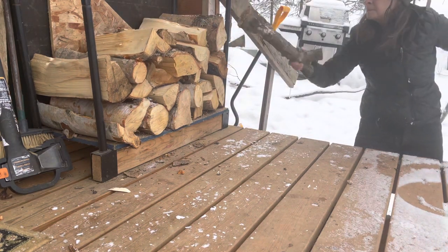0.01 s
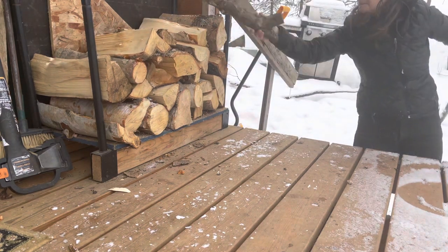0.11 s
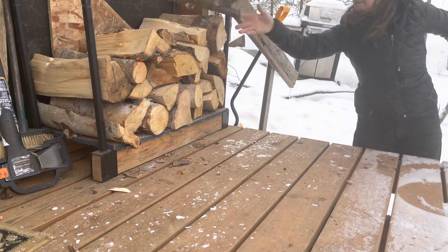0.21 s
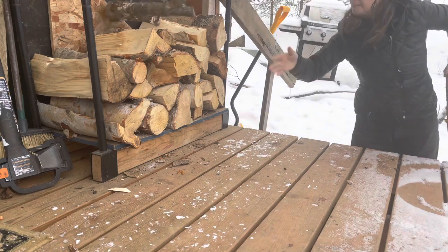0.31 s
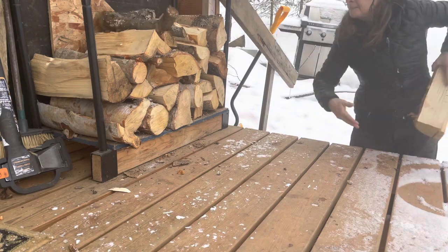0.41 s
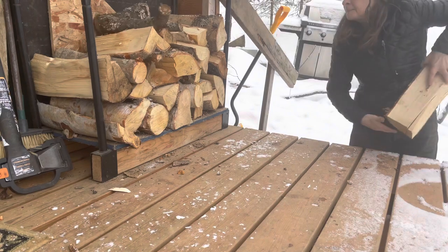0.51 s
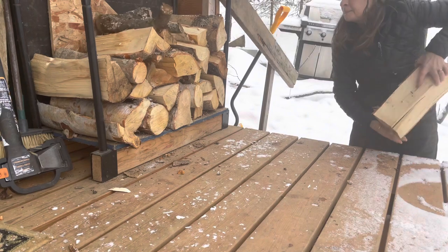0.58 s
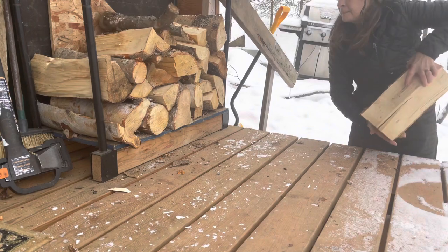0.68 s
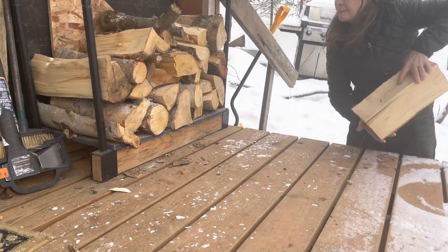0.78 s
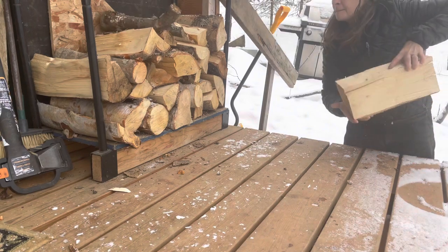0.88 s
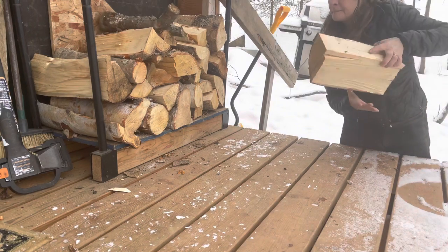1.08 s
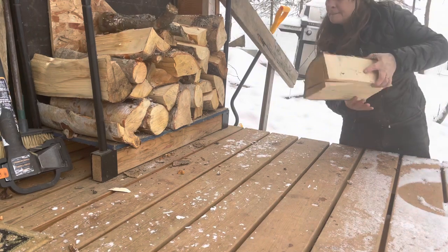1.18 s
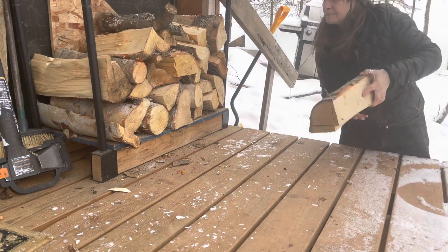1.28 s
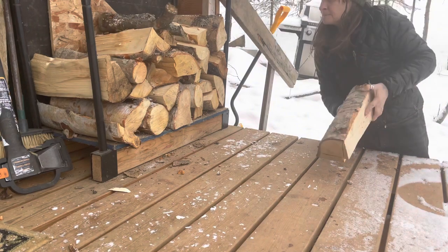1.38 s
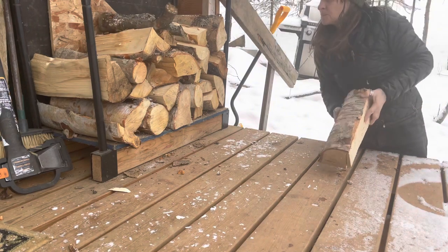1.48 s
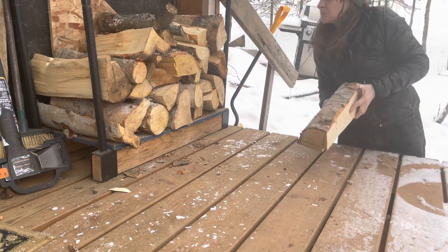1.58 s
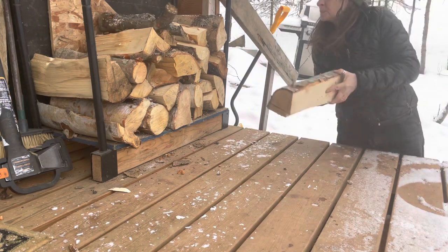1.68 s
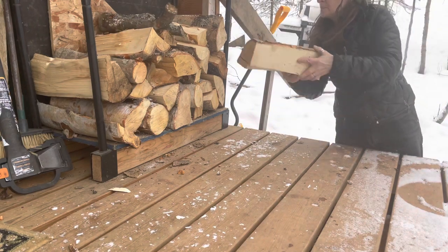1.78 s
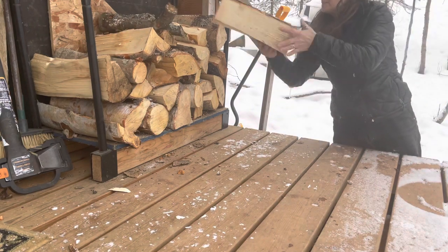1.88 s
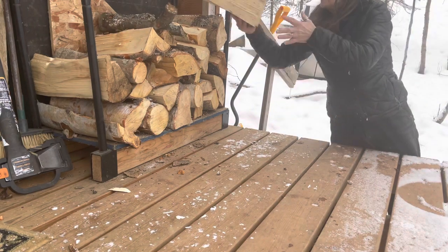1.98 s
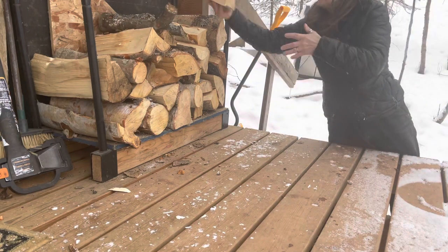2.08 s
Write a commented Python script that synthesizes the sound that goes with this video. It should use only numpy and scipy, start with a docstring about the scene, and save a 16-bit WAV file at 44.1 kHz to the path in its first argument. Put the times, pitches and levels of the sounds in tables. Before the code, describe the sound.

Outdoors on a wooden deck, a faint jacket swish and bark graze lead to a loud log knock at 0.2 s, with a deep, short boom through the boards and log chatter. It rocks and scrapes until a soft hollow settling knock at 0.6 s. A small bright clack comes at 0.78 s, a soft palm pat at 1.23 s, and jacket swishes from 1 s, brightest near 2.04 s, over quiet low air.

```python
"""Outdoors, a jacket swishes as a split log is tossed onto a firewood rack on a wooden deck.
The log grazes the pile, lands with a knock that booms through the boards, rocks, sheds bark and settles.
The next log clacks, then pats into a hand while the padded jacket swishes on over quiet air.
Wood rings as decaying sines; bark and chatter are grainy noise, cloth is grainy and smooth noise,
air is smooth noise, and the wood has a faint outdoor scatter."""
import sys
import numpy as np
from scipy import signal
from scipy.fft import rfft, irfft
from scipy.io import wavfile

SR = 44100
rng = np.random.default_rng(int(sys.argv[2]) if len(sys.argv) > 2 else 0)


def master(y):
    """Save y as 16-bit WAV."""
    cut = np.clip(np.atleast_2d(y).T, -1, 1)
    pcm = np.round(cut * 32767)  # scale
    wavfile.write(sys.argv[1], SR, pcm.astype(np.int16))


N = 92610  # samples, 2.1 s
TIME, FREQS = np.arange(N) / SR, np.fft.rfftfreq(N, 1 / SR)  # s, Hz
FLAT = [(20, 0), (20000, 0)]  # even noise colour: hz, level_db


def amp(db):
    """Decibels to gain."""
    return 10 ** (np.asarray(db) / 20)


def unit(x):
    """Scales to rms 1."""
    return x / np.sqrt(np.mean(x ** 2) + 1e-20)


def read(points, hz):
    """Reads a table on a log-frequency axis."""
    f, value = np.transpose(points)
    return np.interp(np.log(hz + 1), np.log(f + 1), value)


def level(points, axis=1):
    """Gain over time from one dB column of a curve."""
    columns = np.transpose(points)
    return amp(np.interp(TIME, columns[0], columns[axis]))


def since(start):
    """Time since an event, zero before it."""
    return np.maximum(TIME - start, 0)


def fade(t, rise, t60):
    """Quick rise and exponential decay; t60 is the time to fall 60 dB."""
    decay = np.exp(-np.log(1000) * t / t60)
    return (1 - np.exp(-t / rise)) * decay


def swell(t, peak_s):
    """Grows to a peak and dies quickly."""
    return (t / peak_s * np.exp(1 - t / peak_s)) ** 2


def pan(db):
    """Left and right gains; positive leans left."""
    return amp(np.array([[db], [-db]]) / 2)


def dull(hz, edge_hz):
    """A soft contact excites little above its edge."""
    return 1 / np.sqrt(1 + (hz / edge_hz) ** 4)


def ring(t, hz, db, t60, rise):
    """One decaying mode."""
    return amp(db) * fade(t, rise, t60) * np.sin(2 * np.pi * hz * t)


def tap(s, db, modes):
    """A light contact rings a log's notes once."""
    rise_s = 0.001
    return sum(ring(since(s), hz, db + mode_db, t60, rise_s) for hz, mode_db, t60 in modes)


def noise(spectrum, grainy=False):
    """Coloured stereo noise, smooth or made of tiny snaps."""
    # likeness of the two channels: hz, left_right_correlation
    likeness = [(60, 1), (160, .88), (440, 0.59), (1700, 0.63), (3500, 0.28), (7000, 0.52), (9500, -0.31),
                (11000, -0.36)]
    grains_per_s, grain_spread_db = 4600, 3
    z = rng.standard_normal((2, N))
    if grainy:
        snaps = rng.random((2, N)) < grains_per_s / SR
        loudness = np.minimum(rng.exponential(1, (2, N)), 4)  # a few snaps stand out
        z = np.sign(z) * snaps * amp(grain_spread_db * loudness)
    same = np.clip(read(likeness, FREQS), -1, 1)
    coloured = rfft(z) * amp(read(spectrum, FREQS))
    # the likeness sets the balance of mid and side
    mid, side = irfft(coloured * np.sqrt([1 + same, 1 - same]), N)
    return unit(np.array([mid + side, mid - side]))


def jacket():
    """Sleeves rub the padded coat as the arms swing."""
    # swish strength: start_s, body_db, treble_db
    swish = [(0, -79, -56), (.05, -84, -65.5), (.08, -90.5, -84), (.95, -82, -87), (.99, -67.5, -64),
             (1.16, -67.5, -56.5), (1.22, -61, -57), (1.27, -58, -56), (1.37, -55.5, -57.5),
             (1.5, -62, -67), (1.6, -65, -64.5), (1.75, -56.5, -54.5), (1.85, -56, -58), (1.95, -62, -63),
             (2.005, -68, -55), (2.04, -57.5, -43), (2.065, -61, -53.5), (2.1, -68.5, -65.5)]
    # colour of the padding's grainy body: hz, level_db
    cloth_body = [(80, -15), (250, -2), (750, 3.5), (1400, 1), (2200, -0.5), (3200, -8.5), (6000, -29.5)]
    # colour of the smooth treble: hz, level_db
    cloth_hiss = [(500, -21), (2000, -1.5), (3500, -4.5), (5500, -7), (7200, -8), (8500, 2.5), (9700, 3),
                  (12500, -16.5)]
    body = noise(cloth_body, grainy=True) * level(swish, axis=1)
    treble = noise(cloth_hiss) * level(swish, axis=2)
    return pan(db=1) * (body + treble)


def air():
    """Quiet outdoor rumble with a trace of hiss."""
    # colour before the treble is dulled: hz, level_db
    air_colour = [(15, -32.5), (25, -6), (106, -2), (349, -17), (665, -18.5), (1060, -29), (1920, -14.5),
                  (5820, -25), (9030, -13), (12000, -60)]
    level_db, dull_hz = -58.5, 850
    softening = 0.15 + dull(FREQS, dull_hz)  # the floor keeps some hiss
    softened = irfft(rfft(noise(air_colour)) * softening, N)
    return pan(db=1.56) * amp(level_db) * unit(softened)


def bark():
    """Bark scrapes and crumbles, and crunches under each contact with wood or hand."""
    # scrape strength: start_s, level_db
    scrape_curve = [(0, -57), (.045, -56), (.07, -70.5), (.2, -61.5), (.22, -44), (.26, -40), (.32, -61),
                    (.345, -49.5), (.372, -42.5), (.41, -54), (.48, -50), (.54, -58), (.65, -54),
                    (.745, -65), (.79, -54), (.82, -53.5), (.87, -70)]
    # colour of scraping bark: hz, level_db
    scrape_colour = [(200, -3.5), (1000, -1.5), (2500, -0.5), (5000, -5), (7000, -2.5), (9000, 5),
                     (11000, 1.5), (12500, -13.5)]
    # crunches: start_s, level_db, t60_s, left_right_db
    crunches = [(0.1554, -48.5, 0.024, 6), (0.204, -16.5, 0.023, 0), (0.2064, -19.5, 0.013, 6.5),
                (0.254, -38, 0.037, 8), (0.292, -42, 0.042, 4), (0.3699, -35, .01, 2),
                (0.489, -44, .008, -3), (0.7821, -32.5, 0.017, 2.5), (1.2273, -46.5, 0.02, 1)]
    # colour of a crunch: hz, level_db
    crunch_colour = [(100, -9), (700, -1.5), (2500, -3.5), (4000, -2), (5200, -11), (7500, -4), (10000, -6),
                     (12500, -23)]
    rise_s = 0.00032
    bursts = sum(pan(lr) * amp(db) * fade(since(s), rise_s, t60) for s, db, t60, lr in crunches)
    crunch = noise(crunch_colour) * bursts
    scrape = noise(scrape_colour, grainy=True) * level(scrape_curve)
    return crunch + pan(db=2.5) * scrape


def rubs():
    """Bark and splinters catch, buzz and let go: rough noise in one resonance each."""
    # rubs: start_s, level_db, pitch_hz, width_hz, t60_s, length_s
    rub_list = [(0, -54.5, 1215, 89, .4, 0.063), (0, -58.5, 2580, 300, 0.97, 0.063),
                (0.121, -48, 470, 830, 0.15, 0.034), (0.159, -45, 1002, 850, 0.21, 0.13),
                (0.159, -42.5, 283, 380, 0.17, 0.082), (0.346, -40, 590, 540, 0.18, 0.037),
                (.564, -28.5, 10580, 1820, 0.013, 0.019), (0.604, -36, 400, 566, 0.11, 0.067),
                (0.784, -49.5, 282, 400, 0.1, 0.068), (0.777, -42, 2180, 1396, 0.21, 0.069),
                (1.153, -51, 425, 557, 0.12, 0.038), (1.993, -33.5, 9140, 2980, 0.014, .008)]
    rise_s = 0.0016
    rough = rfft(noise(FLAT, grainy=True))
    out = np.zeros((2, N))
    for s, db, hz, width, t60, length in rub_list:
        t = since(s)
        buzz = unit(irfft(rough * dull(FREQS - hz, width / 2), N))
        let_go = np.exp(-(t / length) ** 6)
        out += amp(db) * buzz * fade(t, rise_s, t60) * let_go
    return pan(db=1.5) * out


def blows():
    """Wood on wood or on a palm: a few cycles that swell and die quickly."""
    # dry blows: start_s, level_db, pitch_hz, time_to_peak_s, left_right_db
    blow_list = [(.1478, -38, 915, 0.00061, 10), (.1556, -27, 780, 0.00056, -4),
                 (.2046, -7.5, 948, 0.0021, 9.5), (0.2071, -19, 2536, .001, 13.5),
                 (.3495, -36, 520, 0.0034, 9), (0.783, -25, 1820, 0.00094, -7),
                 (0.7824, -33.5, 3120, 0.00047, 4), (1.2281, -31, 600, 0.00086, -3),
                 (1.234, -42.5, 313, 0.00094, 5)]
    out = np.zeros((2, N))
    for s, db, hz, peak_s, lr in blow_list:
        t = since(s)
        out += pan(lr) * amp(db) * swell(t, peak_s) * np.sin(2 * np.pi * hz * t)
    return out


def log_knocks():
    """Each contact rings the tossed log; the pile damps it more or less."""
    # the log meeting the pile: start_s, level_db, dull_above_hz, ring_length_ratio, left_right_db
    knocks = [(.156, -33, 1700, 0.27, 6), (.2052, -16, 2270, 1, 8.5), (.2185, -23, 1450, 0.49, -9),
              (.228, -20, 1700, 0.57, 0), (.349, -39.5, 1000, 0.56, 15), (.3635, -38.5, 1110, .5, 3)]
    # notes of the tossed log: pitch_hz, level_db, t60_s (before the ring length ratio)
    log_notes = [(478, -6, 0.16), (556.2, -5.5, 0.15), (597.2, 0, .13), (676, -6, 0.1), (794, -7, 0.086),
                 (963, -6, 0.095), (875, -8.5, 0.079), (1049.6, -10, 0.071), (1138, -10, 0.14),
                 (1235, -9, .15), (1253, -10.5, .13), (1475, -17, 0.084), (1903, -11, 0.1),
                 (2547, -17.5, 0.092)]
    rise_s = 0.0026
    out = np.zeros((2, N))
    for s, db, edge, length, lr in knocks:
        t = since(s)
        for hz, mode_db, t60 in log_notes:
            note = ring(t, hz, db + mode_db, t60 * length, rise_s)
            out += pan(lr) * note * dull(hz, edge)
    return out


def thud():
    """The first bending wave: high notes cross the boards first, so the landing sweeps downward."""
    start_s, level_db, peak_s = 0.2052, -1.7, 0.0089
    from_hz, to_hz, glide_s = 885, 60.06, 0.0054
    t = since(start_s)
    # cycles so far, as the pitch slides exponentially
    turns = to_hz * t + (from_hz - to_hz) * glide_s * (1 - np.exp(-t / glide_s))
    return pan(db=2.5) * amp(level_db) * swell(t, peak_s) * np.sin(2 * np.pi * turns)


def deck():
    """Weight falling on rack and deck booms through the boards at the landing and as the log rocks."""
    # falls of weight: start_s, level_db, dull_above_hz
    thumps = [(0.2096, -2.5, 916), (.366, -28, 262)]
    # notes of rack and deck: pitch_hz, level_db, t60_s
    deck_notes = [(53.92, -16.5, 0.63), (69.75, -30, 0.52), (95.9, -2.5, .21), (140, -16.5, .19),
                  (151.9, -14, 0.13), (187, -1, 0.08), (211, -15, .19), (250, -3, 0.05),
                  (440.5, -13, 0.089)]
    bend_s, rise_s = 0.006, 0.0045  # bend_s: travel time of a 100 Hz bending wave
    out = 0
    for s, db, edge in thumps:
        for hz, mode_db, t60 in deck_notes:
            arrival_s = s + bend_s * np.sqrt(100 / hz)  # low notes arrive later
            out = out + ring(since(arrival_s), hz, db + mode_db, t60, rise_s) * dull(hz, edge)
    return pan(db=1.5) * out


def pile():
    """Neighbouring logs chatter against each other after a jolt."""
    # bouts of chatter: start_s, level_db, t60_s
    chatter = [(.214, -19.5, 0.22), (0.343, -39.5, 0.81)]
    # colour of the chatter: hz, level_db
    pile_colour = [(40, -14.5), (130, 3), (220, 4.5), (400, -9), (700, -13), (1200, -14.5), (1700, -24.5),
                   (3000, -33), (8000, -34.5), (12000, -43.5)]
    bouts = sum(amp(db) * fade(since(s), 0.004, t60) for s, db, t60 in chatter)
    return pan(db=2.0) * noise(pile_colour, grainy=True) * bouts


def rocking():
    """The loaded rack rocks on the boards in soft low swells."""
    # rocks: middle_s, level_db, pitch_hz, half_length_s
    rocks = [(0.335, -29, 56, 0.023), (0.381, -30.5, 72.5, 0.0094), (0.409, -26.5, 67, 0.013),
             (0.464, -37.5, 59.6, 0.031), (0.524, -31.5, 78.5, 0.022), (0.552, -37, 101, 0.017),
             (0.647, -44, 75.4, 0.025)]
    out = 0
    for s, db, hz, half in rocks:
        t = TIME - s
        out = out + amp(db) * np.exp(-(t / half) ** 2) * np.sin(2 * np.pi * hz * t)
    return pan(db=1.5) * out


def seating():
    """A log below drops into its seat with one soft, hollow knock as the pile settles."""
    # notes of the seated log: pitch_hz, level_db, t60_s
    seated_log = [(212.5, -5, 0.092), (283, -5, 0.05), (478.5, -3.5, 0.24), (576, 1, 0.11),
                  (526, 1.5, 0.053), (808, -5, 0.064), (1120, -15, 0.12), (1239, -8, 0.13)]
    return pan(db=4.0) * tap(s=0.6035, db=-33.5, modes=seated_log)


def clack():
    """A small, bright knock on the next log as it is picked up."""
    # notes of the next log: pitch_hz, level_db, t60_s
    clacked_log = [(1662, -2.5, 0.098), (1705, 1, 0.091), (1967, -3, 0.063), (2085, -2, 0.087),
                   (2696, 1, 0.024), (3100, -2, 0.032)]
    return pan(db=1) * tap(s=0.7838, db=-40, modes=clacked_log)


def from_left(x):
    """The rack stands to the left, so its sound reaches the right channel slightly later."""
    right_lag_s = 0.00003
    lag = np.exp(-2j * np.pi * FREQS * right_lag_s)
    return np.array([x[0], irfft(rfft(x[1]) * lag, N)])


def yard(x):
    """Scatter from wall, rack and deck: a noise tail that decays differently in each band."""
    # decay of the scatter: hz, t60_s
    yard_decay = [(60, 0.84), (250, 0.32), (1000, 0.29), (4000, 0.067), (10000, 0.36)]
    taps = noise(FLAT)[:, :SR]  # one second
    hz, t, z = signal.stft(taps, SR, nperseg=256)
    decay = fade(t, 0.0023, read(yard_decay, hz)[:, None])
    tail = signal.istft(z * decay, SR, nperseg=256)[1]
    tail = tail / np.linalg.norm(tail[0])
    return signal.fftconvolve(x, tail, axes=1)[:, :N]


def scene():
    """Wood sounds with their faint scatter, the jacket and the air."""
    yard_db = -20.5
    struck = from_left(blows() + log_knocks() + thud() + deck() + rocking() + seating())
    wood = struck + bark() + rubs() + pile() + clack()
    return wood + amp(yard_db) * yard(wood) + jacket() + air()


def record(dry):
    """The loudest peaks are rounded off; then a low-pass removes the top treble."""
    ceiling, edge_hz = 0.95, 12400
    rounded = dry / (1 + (dry / ceiling) ** 6) ** (1 / 6)
    low_pass = signal.firwin(301, edge_hz, window=("kaiser", 8), fs=SR)
    return signal.oaconvolve(rounded, low_pass[None], "same")


dry = scene()
out = record(dry)
master(out)
```